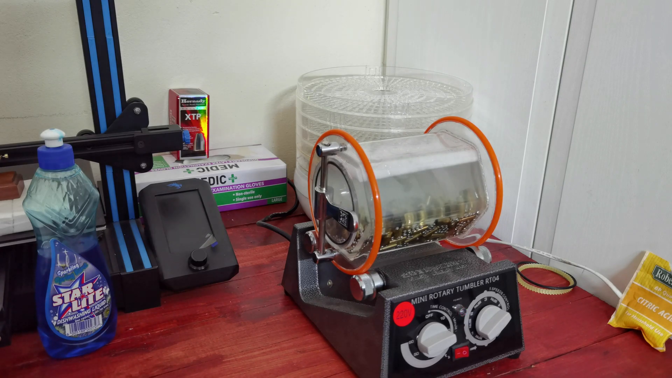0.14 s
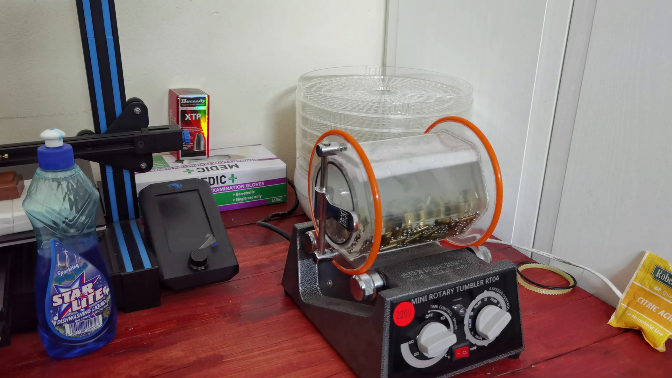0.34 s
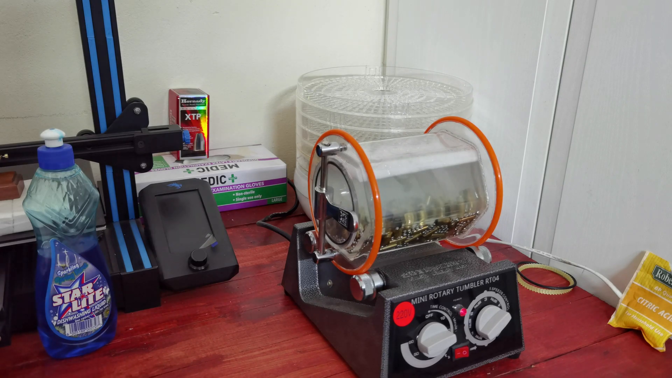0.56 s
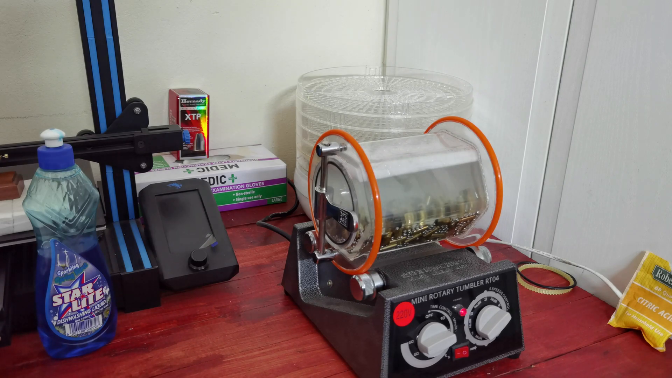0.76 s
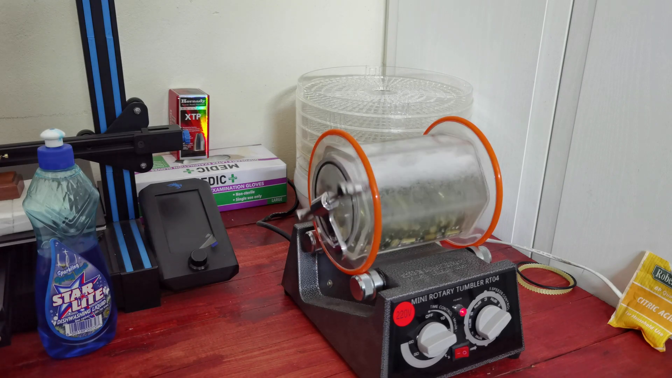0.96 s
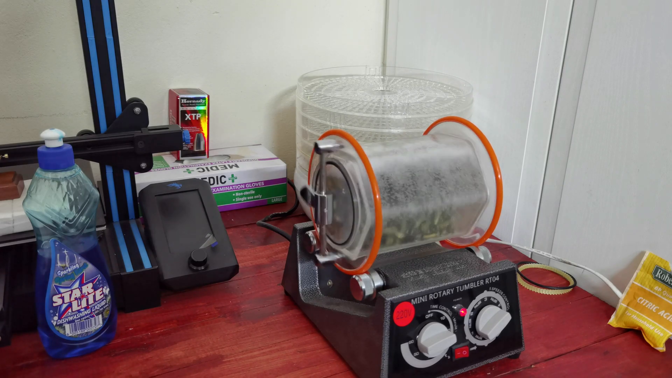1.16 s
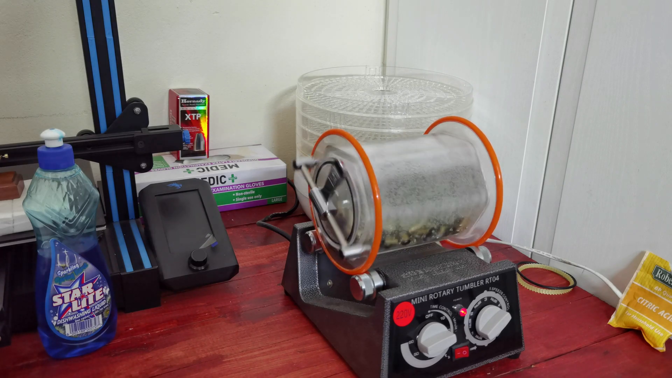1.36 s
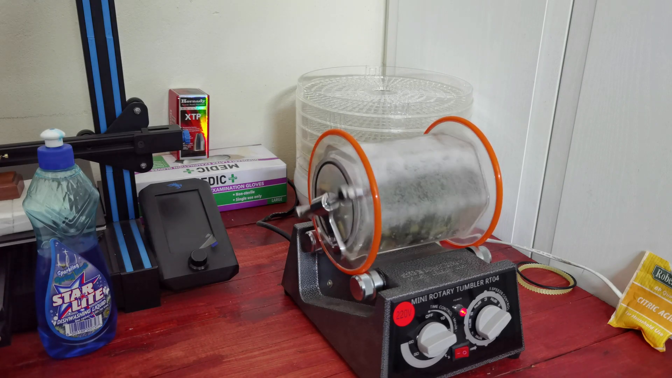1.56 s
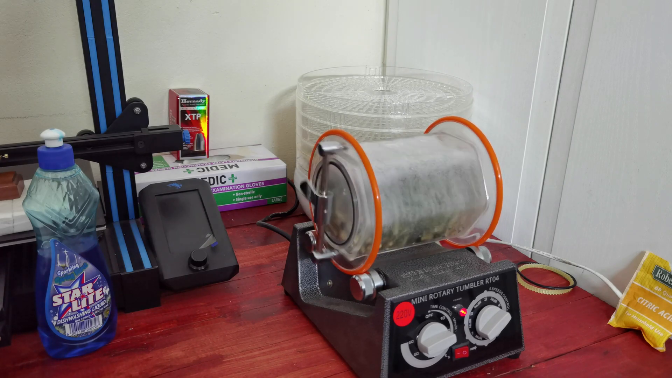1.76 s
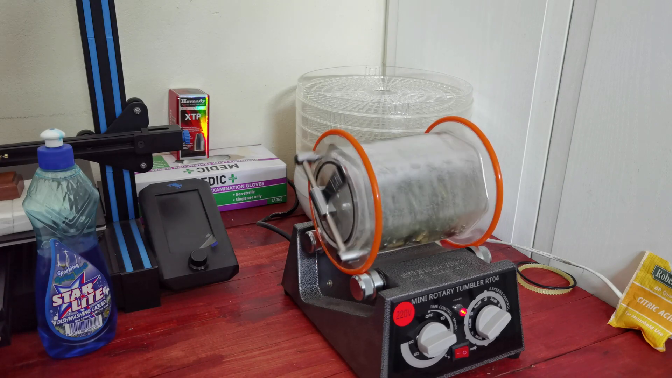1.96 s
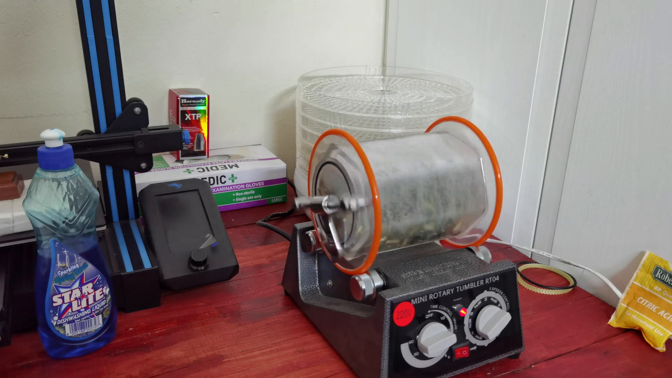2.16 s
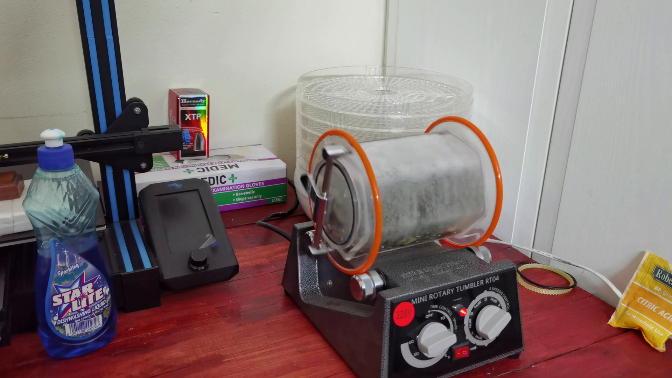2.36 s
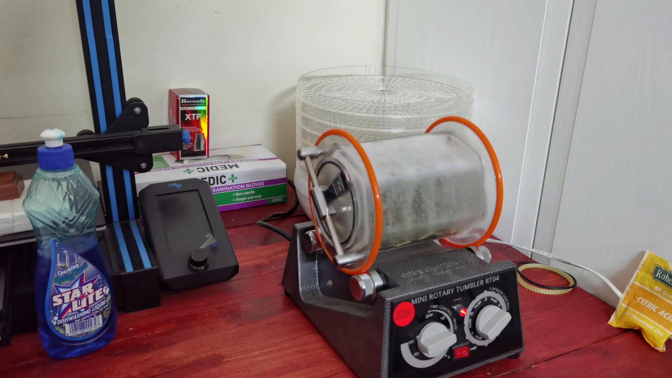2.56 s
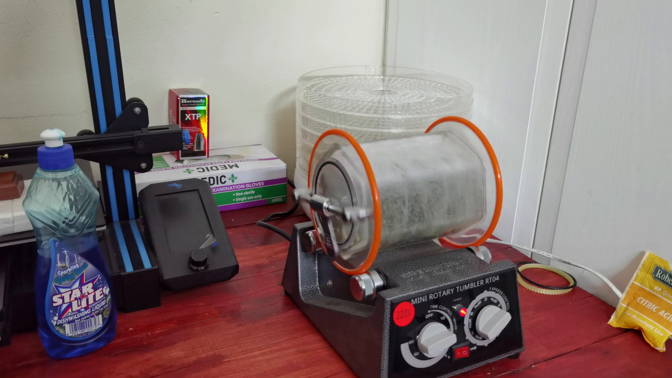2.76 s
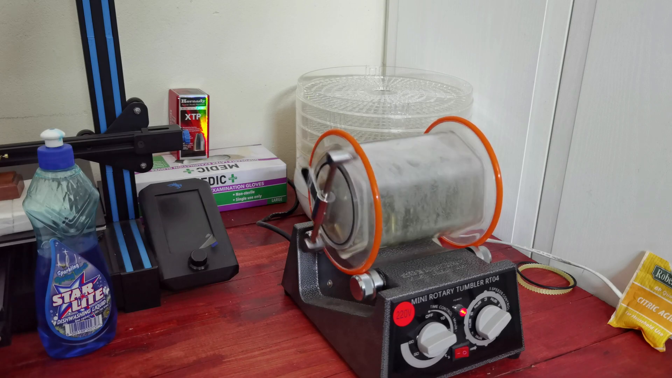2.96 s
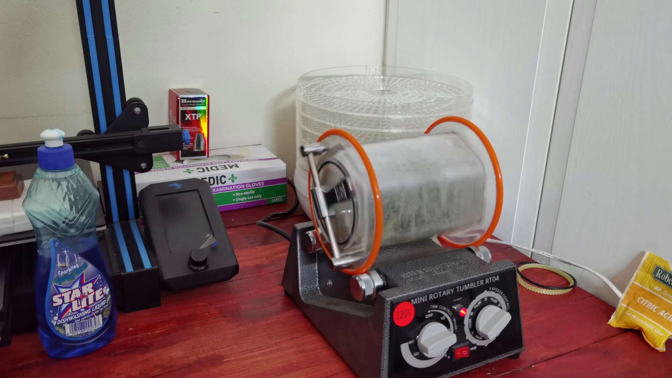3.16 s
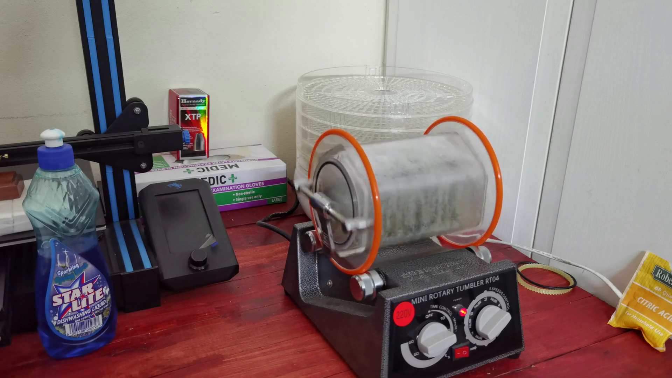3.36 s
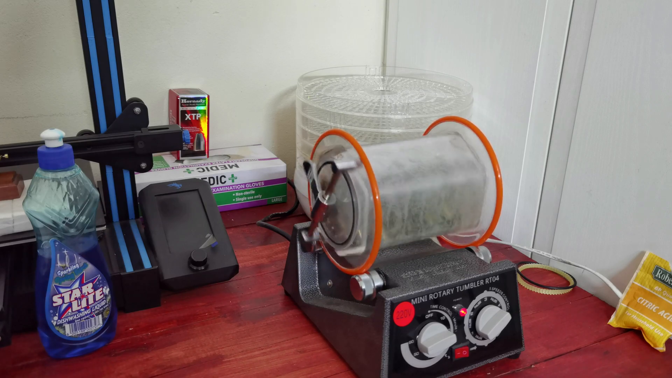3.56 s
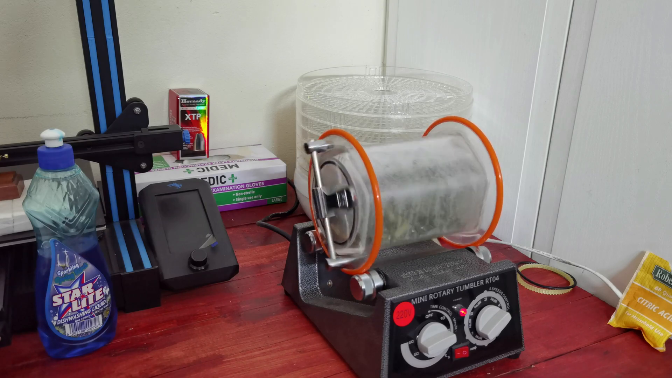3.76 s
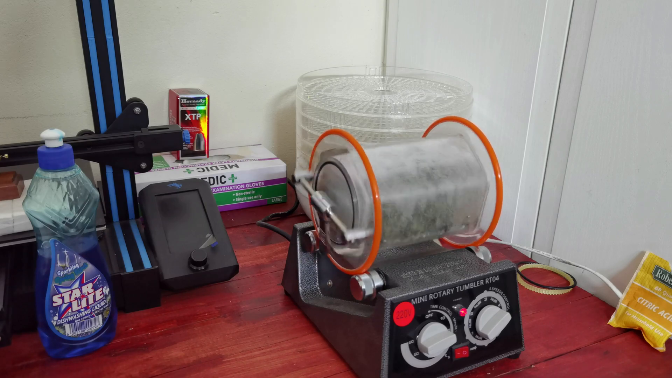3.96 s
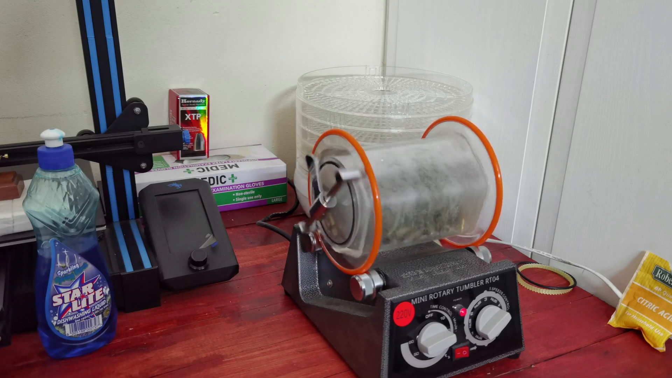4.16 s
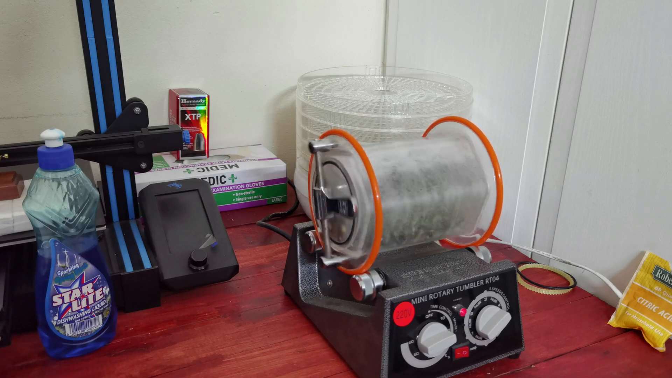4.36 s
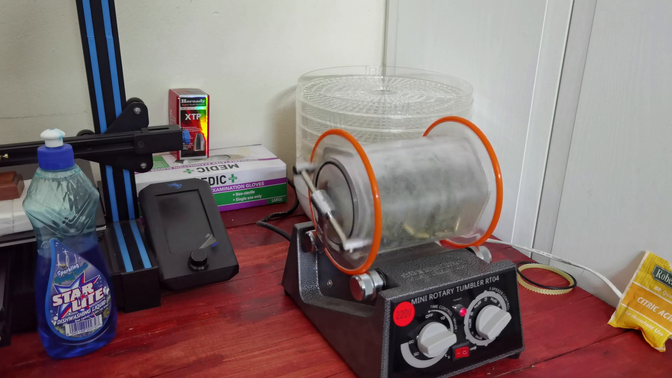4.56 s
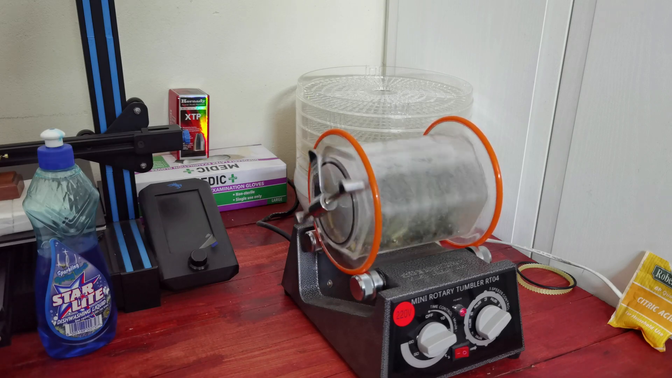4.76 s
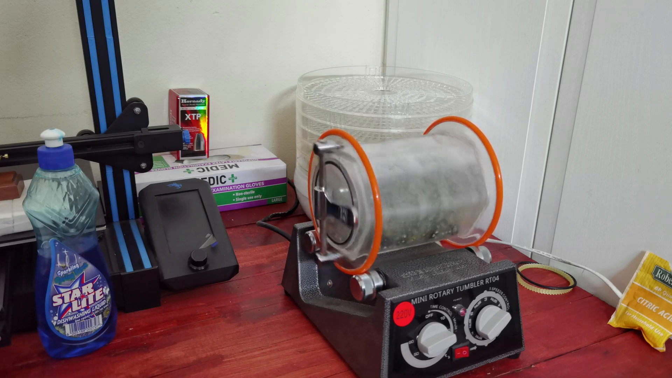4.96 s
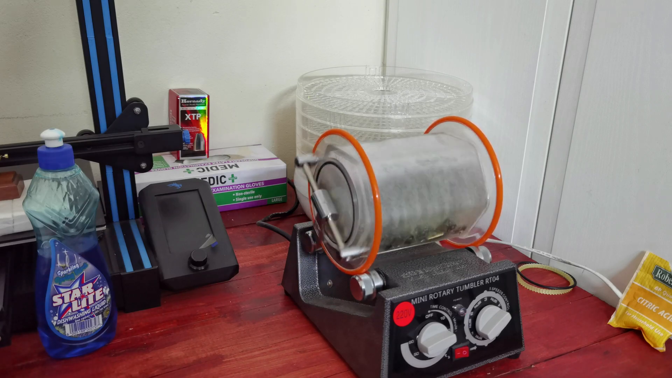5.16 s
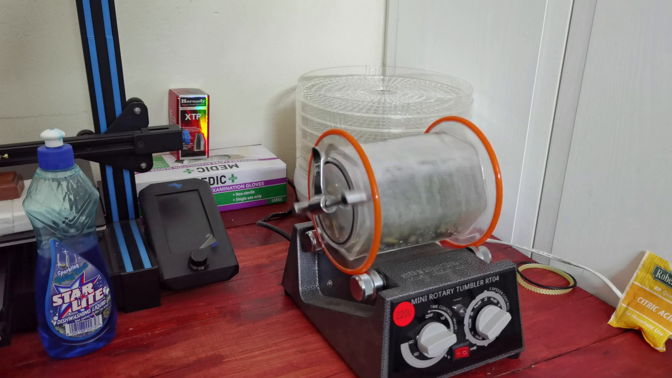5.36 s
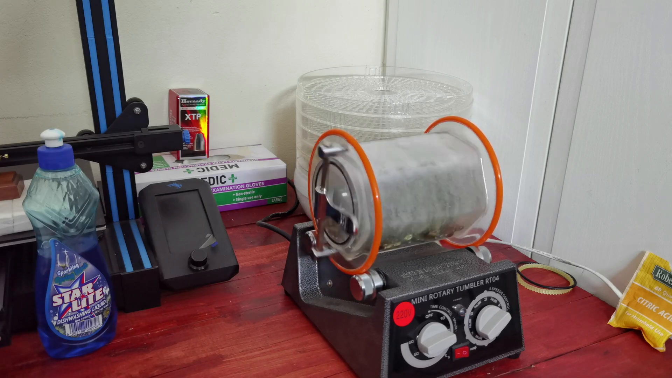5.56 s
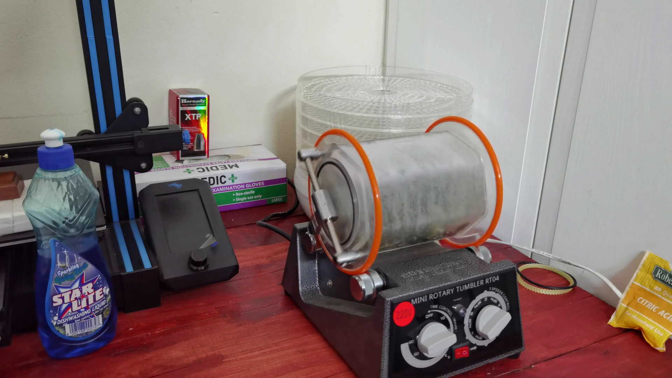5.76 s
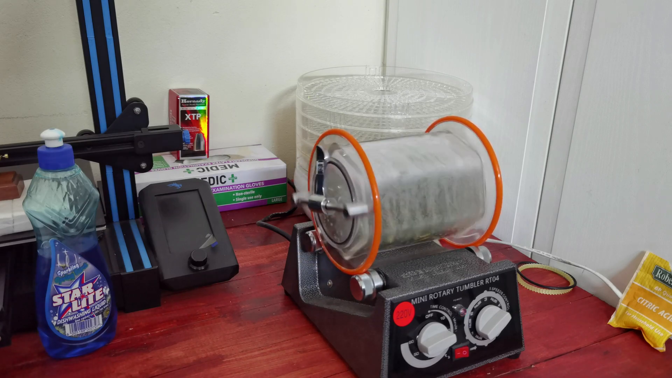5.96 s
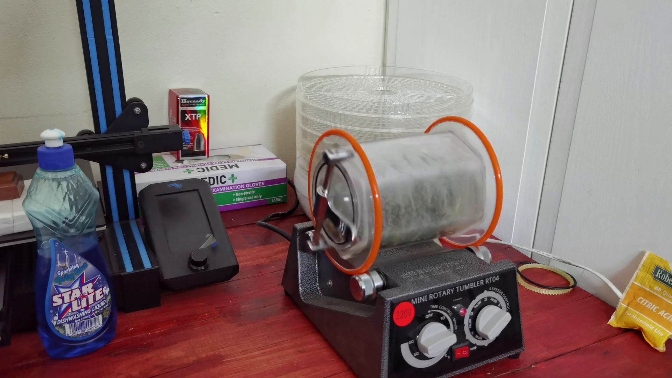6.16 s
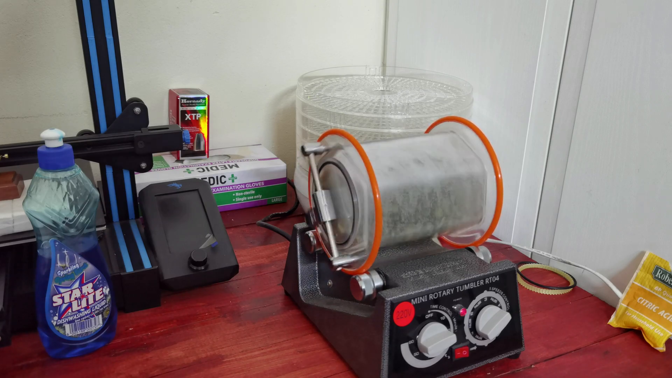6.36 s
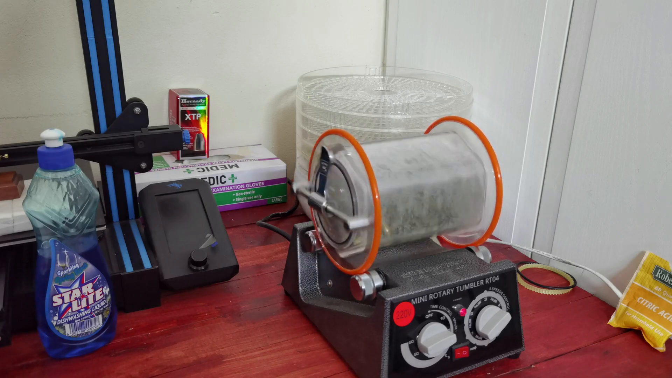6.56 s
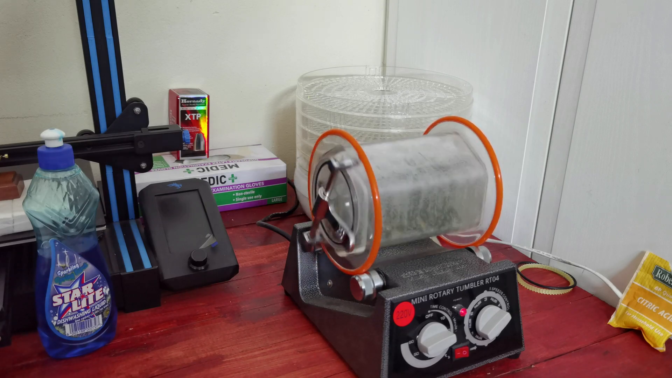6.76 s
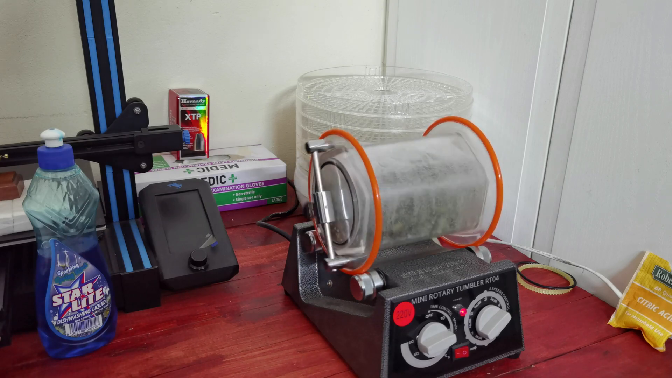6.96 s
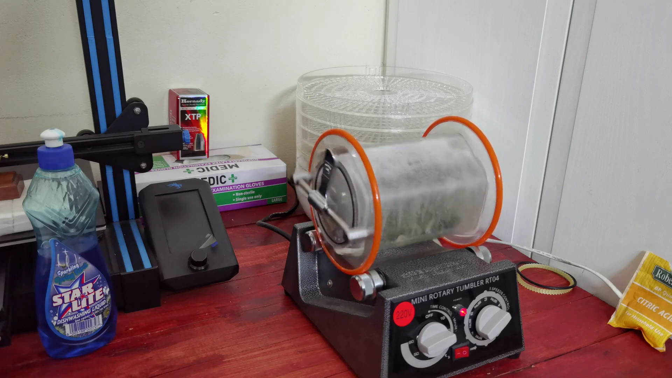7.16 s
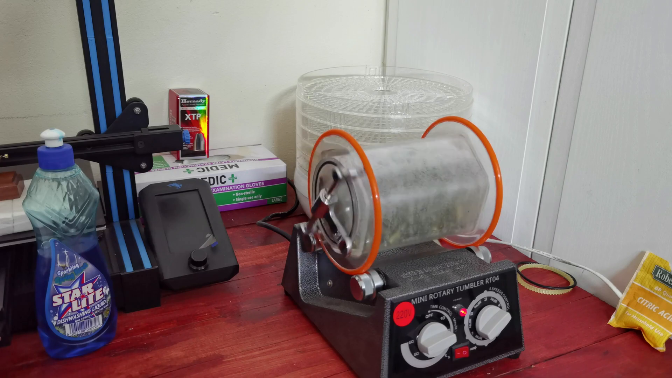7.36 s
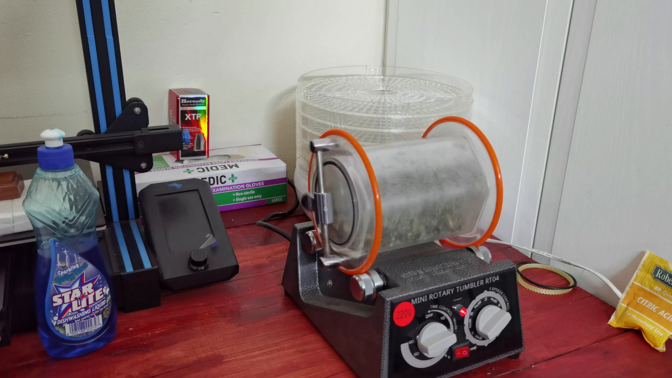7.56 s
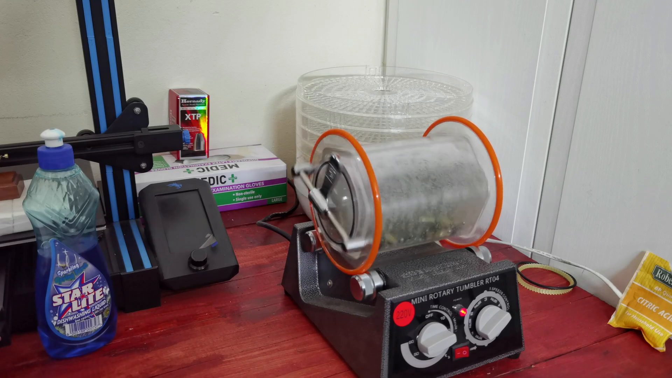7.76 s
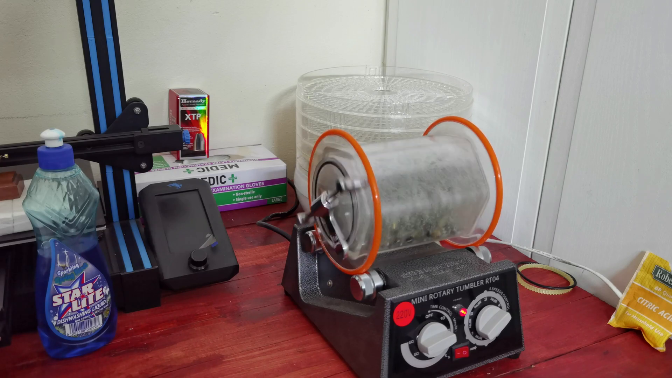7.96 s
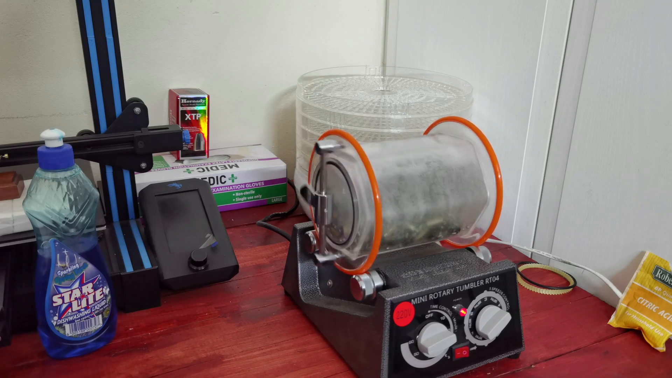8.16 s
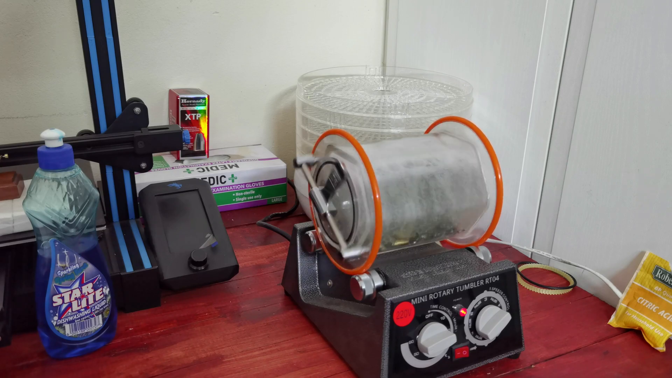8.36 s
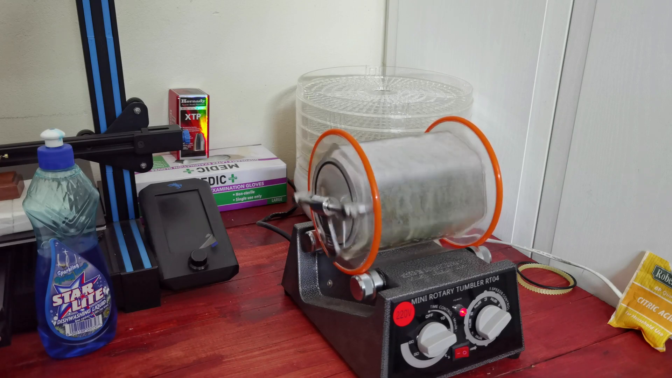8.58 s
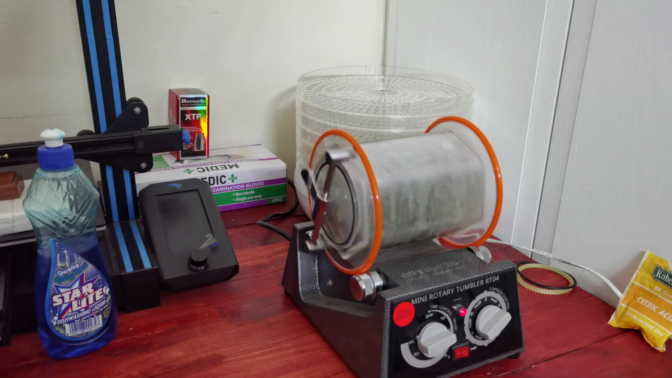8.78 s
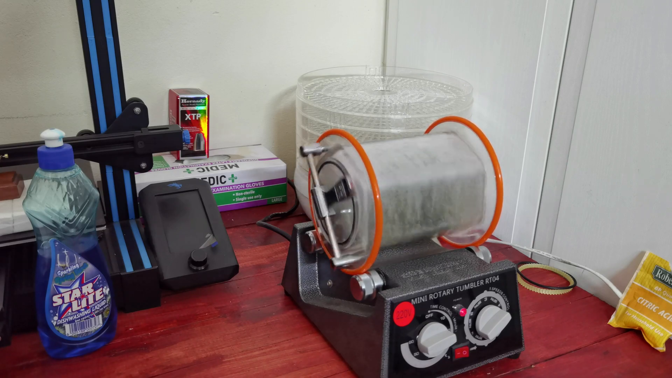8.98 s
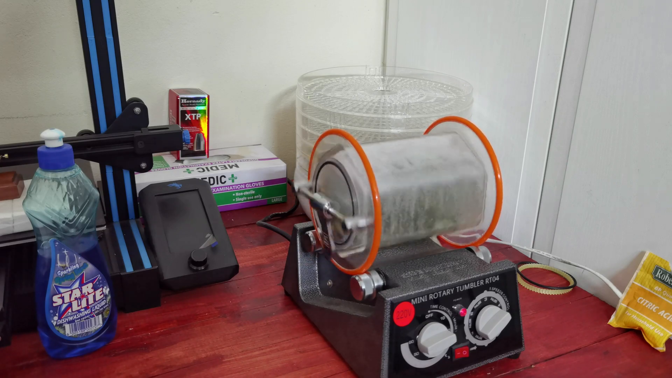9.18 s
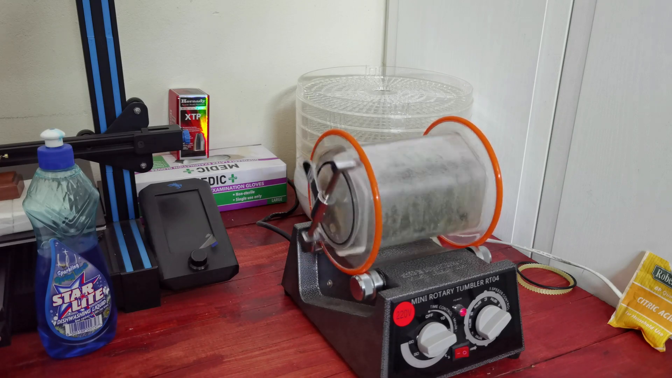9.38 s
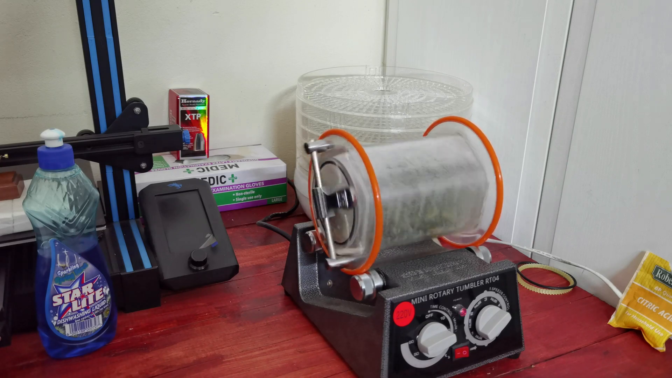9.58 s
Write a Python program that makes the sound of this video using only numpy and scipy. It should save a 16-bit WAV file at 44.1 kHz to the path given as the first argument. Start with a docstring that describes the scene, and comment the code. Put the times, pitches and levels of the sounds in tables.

```python
"""On a desk in a quiet room, a small motor turns a plastic drum of brass cases, steel pins and soapy water.
A faint rattle ticks, a switch snaps and the motor starts. Countless small impacts merge into a hiss,
over which single cases ring against the wall. The motor hums, its gears whine up to speed, and a bump
in the drive thumps the desk about twice a second. The whole level sinks slowly, with a few brief dips."""
import sys
import numpy as np
from scipy import signal
from scipy.fft import rfft, irfft, next_fast_len
from scipy.io import wavfile
from scipy.ndimage import uniform_filter1d, minimum_filter1d, map_coordinates

SR = 44100
rng = np.random.default_rng(int(sys.argv[2]) if len(sys.argv) > 2 else 0)


def bounce(signal):
    """Save signal as a 16-bit WAV file at the path given by the first command-line argument."""
    frames = np.transpose(np.atleast_2d(signal))
    limited = np.clip(frames, -1, 1)
    pcm = np.round(limited * 32767).astype(np.int16)
    wavfile.write(sys.argv[1], SR, pcm)


N = 424241
TIME = np.arange(N) / SR

# Table levels are relative: each source adds its own gain.
# The load is lifted, falls, then churns evenly: time_s, hiss_db, knock_over_hiss_db
LOAD_LEVELS = [(0.93, -35, -13), (0.995, -38, -15), (1.01, -32, -18), (1.085, -35, -19), (1.1, -28.5, -13),
               (1.125, -28, -14.5), (1.19, -15, -19), (1.24, -14, -15), (1.3, -16.5, -15),
               (1.42, -15.5, -13.5), (1.51, -17, -12), (1.58, -19.5, -12), (1.9, -17, -15),
               (3.0, -17.5, -13.5), (9.62, -17.5, -14)]
# Louder slides of the heap: peak_s, boost_db
SLIDES = [(1.9, 6), (2.395, 1), (2.5, 3), (2.6, 2), (3.07, 2), (3.16, 6), (3.38, 4), (3.6, 4), (3.96, 4.5),
          (4.14, 0), (5.52, 3), (5.63, 4), (5.7, 3.5), (5.8, 5), (6.1, 4.5), (6.67, 4), (7.26, -3),
          (8.3, 3), (8.74, 3.5), (9.11, 3.5), (9.29, 4), (9.38, 3.5)]
# Steady flutter of the load: rate_hz, peak_s, depth_db
LOAD_FLUTTER = (10.3, 0.082, 0.47)
# Spectrum of the steel pins: frequency_hz, level_db
PIN_SPECTRUM = [(2350, -39.5), (4000, -36), (4640, -18), (5300, -11), (5880, -8), (6500, -7), (7200, -6.5),
                (7900, -1.5), (8430, 1.5), (8920, -3), (9600, -9.5), (11400, -23), (14800, -53.5),
                (22000, -120)]
# Spectrum of the brass cases: frequency_hz, level_db
CASE_SPECTRUM = [(500, -60.5), (800, -15.5), (1000, -17.5), (1300, -10), (1700, -9.5), (1950, -5),
                 (2800, -2.5), (3450, 1), (4300, 0), (5500, -3), (7000, -56)]
# Loudest blows of cases on the wall: start_s, level_db, pitch_hz, left_over_right_db
CLACKS = [(1.092, -30, 5200, 0), (1.1022, -23, 3180, -2), (1.3931, -15, 2200, 5), (1.4796, -22, 4170, 4),
          (1.514, -16, 4150, 0.0), (1.6303, -14, 3390, 2.5), (1.8127, -17, 4860, 2.0),
          (1.8965, -18, 4460, 0.5), (1.986, -22, 4380, 1.5), (2.024, -16, 4860, 1), (2.077, -22, 4080, 0.5),
          (2.375, -20, 3440, -1), (2.48, -14, 3060, 3), (2.5869, -16, 3520, 0.5), (2.6877, -20, 2900, 0),
          (2.781, -15, 3590, 3), (2.8365, -25, 4560, 0.0), (2.8947, -20, 4960, 3), (3.0284, -14, 4970, 0.0),
          (3.063, -24, 3400, 1.0), (3.151, -19, 4140, 1.0), (3.2644, -22, 4470, 0.5),
          (3.2964, -15, 4800, 3), (3.357, -14, 4450, 2), (3.444, -21, 4360, 0.5), (3.5083, -22, 4910, 0.0),
          (3.5311, -21, 4270, 2.0), (3.57, -21, 5050, -0.5), (3.7697, -24, 4540, 1.5),
          (3.9523, -23, 4810, -2), (4.0343, -16, 2720, 1), (4.1486, -19.5, 3450, 0.0),
          (4.2477, -14, 4920, 3), (4.317, -24, 2030, 0), (4.4107, -17, 3190, 1.5), (4.709, -12.5, 4870, 5),
          (4.8388, -14.5, 3800, 3), (4.9156, -21, 2880, 1.0), (4.944, -17, 3620, 0.5),
          (5.1211, -24, 4430, 3), (5.6058, -20, 3950, 1.0), (5.6754, -19, 4530, 1.0),
          (5.794, -16, 3120, -1), (5.844, -22, 4940, 1), (5.9096, -23, 4750, 5), (6.0894, -21.5, 4470, 1.5),
          (6.2014, -16, 3940, 0.5), (6.3067, -15, 4080, -0.5), (6.5329, -26, 5000, 1.0),
          (6.5689, -23, 4660, 5), (6.662, -16, 3320, 3), (6.767, -15, 3460, 5), (6.9546, -13, 3580, 2),
          (7.03, -17, 3910, 0.5), (7.058, -11.5, 3800, 2.0), (7.252, -22, 4300, 0), (7.261, -12.5, 3500, 3),
          (7.3325, -14, 6300, 2), (7.4269, -18, 3610, 1), (7.5282, -18, 4440, 3.0), (7.6324, -12, 4440, 0),
          (7.7432, -19, 3730, 1.0), (7.8095, -16, 4960, 3), (7.911, -13, 4340, 1.0),
          (8.0363, -14, 4900, -2), (8.1163, -19, 4820, 2.0), (8.1984, -16, 4970, 0.5),
          (8.493, -29, 3370, 1.5), (8.593, -24, 4070, 1.5), (8.6182, -22, 4990, 3), (8.702, -21, 3400, 3),
          (8.7373, -21, 3620, 1.0), (8.863, -17, 3170, 3), (8.8893, -17, 4770, -0.5),
          (9.09, -14.5, 3380, 1), (9.2935, -16, 4430, 4), (9.365, -18, 4470, 6), (9.4718, -19, 4980, 2.0)]
# Handfuls of pins landing at once: start_s, level_db, left_over_right_db
SPILLS = [(1.0051, -19, -1.5), (1.0276, -22, -0.5), (1.0454, -21, -1.0), (1.0899, -18, 1.0),
          (1.1273, -13, 0.0), (1.1363, -11, 0.0), (1.1567, -11, 0.0), (1.1952, -7, 0.0), (1.276, 1, -4),
          (1.3638, -6, -0.5), (1.5259, -7, -1.0), (1.5563, -10, -4), (1.6686, -11, -1.5),
          (1.7145, -8, -2.0), (1.8207, -1, 0.5), (1.8961, -5, -3), (1.926, -4, -5), (1.9619, -3, -2),
          (2.0238, -8, -0.5), (2.1754, -10, 0.0), (2.2014, -12, -1.5), (2.2942, -14, -0.5),
          (2.3371, -9, 0.0), (2.3914, -3, 0.5), (2.5027, -11, -2.0), (2.569, -12, 0.0), (2.5955, -5, -2.0),
          (2.6269, -6, 1), (2.6868, -4, -2.0), (2.7112, -8, 0.5), (2.7985, -13, 0.0), (2.8354, -1, -2),
          (2.8629, -7, -1.5), (3.0624, -6, 4), (3.1353, -2, 2), (3.247, -17, -1.0), (3.2814, -9, -0.5),
          (3.3567, -6, 0.5), (3.3787, -4, -1.0), (3.4426, -6, -0.5), (3.4665, -6, -0.5), (3.5802, -3, -1.5),
          (3.6381, -11, -2.5), (3.7214, -2, -2), (3.7658, -6, -1.5), (3.7913, -4, 0.5), (3.9085, -4, -9),
          (3.9304, -10, -2.5), (3.9564, -5, -3), (4.0153, -7, -0.5), (4.0447, -6, 0.0), (4.1345, -6, 0.0),
          (4.2467, -11, -1.5), (4.2896, -1, -4), (4.364, -13, -1.5), (4.4318, -3, 0.5), (4.5151, -12, -2.5),
          (4.5899, -10, -0.5), (4.6533, 0, -1.0), (4.7042, -12, 0.5), (4.8394, 0, -2.0), (4.9531, -7, -1.5),
          (4.9766, -2.5, -1.5), (5.009, -5, -1.0), (5.1023, -13, 0.5), (5.1776, -7, 1.0), (5.2115, -2, -1),
          (5.2914, 1, -1), (5.3831, 1, -7), (5.5163, -9, -2.0), (5.6231, -5, -1.0), (5.6989, -7, -1.5),
          (5.7917, -9, 0.0), (5.8446, -7, -0.5), (6.0212, -8, -1.0), (6.0441, -9, 0.5), (6.0955, -4, 0.0),
          (6.1808, -10, 1), (6.344, -10, -5), (6.3879, -10, -1.5), (6.4507, -1, -4), (6.4792, -5, -2.0),
          (6.6657, -10, -1.5), (6.777, -8, -2.5), (6.8558, -13, 0.5), (6.9551, -8, -0.5),
          (7.1561, -18, -1.5), (7.2374, -16, -1), (7.3013, -12, 0.0), (7.3851, -3, 0.0), (7.42, -4, -1.0),
          (7.4504, -4, -1.0), (7.6071, -3, -1.0), (7.658, -3, 0.5), (7.7318, -6, -1.0), (7.7572, -5, -1.5),
          (7.8241, -5, -0.5), (7.9363, -4, -2.5), (8.101, -14, -3), (8.2022, -7, -2.0), (8.3, -4, -1.0),
          (8.3728, -13, -0.5), (8.4921, -5, -1.5), (8.5514, -12, -2.0), (8.6178, -13, -0.5),
          (8.7365, -7, -5), (8.8797, -2, -2), (8.958, -5, -4), (9.0044, -5, -0.5), (9.1057, -12, -1.0),
          (9.2783, -9, 1.5), (9.3267, -5, -1.0), (9.3651, -3, -3), (9.4274, -6, -1.0), (9.5492, 0, 0.0)]
# The motor starts up and then runs evenly; at about 1.26 s the level steps down: time_s, hum_db, under_drum_db,
# # under_motor_db, whine_db
MOTOR_LEVELS = [(0.93, -53, -56, -52, -67), (0.96, -42, -38, -38, -57), (0.99, -38, -51, -31, -55),
                (1.05, -32, -54, -44, -51), (1.1, -36, -47, -40, -46.5), (1.14, -30, -46, -40, -49),
                (1.18, -36, -50, -39, -46), (1.22, -35, -39, -41, -47), (1.29, -45, -56, -51, -54),
                (1.4, -42, -50.5, -48, -57.5), (1.6, -39.5, -51, -43.5, -52.5),
                (9.62, -39.5, -49, -48, -52)]
# Run-up of the shaft: time_s, turns_per_s
SHAFT_SPEED = [(0.93, 4), (0.97, 9), (1.0, 13), (1.035, 15.8), (1.09, 19.8), (1.165, 22.15), (9.62, 22.15)]
# Tooth mesh and its sidebands: cycles_per_turn, level_db, blur_hz
GEAR_LINES = [(30.13, 3, 18), (29.3, 0.5, 22), (31.6, -7, 20), (28.3, -5, 22), (11.95, -5, 5),
              (20.47, -9.5, 18), (34.77, -8, 27)]
# What the casing radiates of the whine: frequency_hz, gain_db
CASING_RESPONSE = [(100, 6), (267, -0.5), (350, 1), (460, -2.5), (560, -9.5), (660, -0.5), (1000, 9)]
# Drone of the casing: frequency_hz, level_db
DRONE_SPECTRUM = [(20, -36), (45, -5), (70, 1.5), (170, -3), (220, -11.5), (270, -2), (330, -16),
                  (600, -14), (1000, -14), (1068, -0.5), (1140, -22.5)]
# Throbs of the hum: rate_hz, peak_s, depth_db
HUM_THROBS = [(5.2, 0.0067, 0.5), (8.2, 0.076, 0.5), (9.8, 0.025, 0), (5, 0.32, 1.5)]
# Pulsing of the whine: rate_hz, peak_s, depth_db
WHINE_PULSE = (10.46, 0.013, 2.3)
# Size of the chance swells: hum_db, under_drum_db, under_motor_db, whine_db
MOTOR_WANDER = (0.7, 3.3, 1.9, 0.73)
# Desk modes under the drum: centre_hz, width_hz, gain_db
MODES_UNDER_DRUM = [(123.6, 5.9, 1.5), (140.3, 15.6, -4)]
# Desk modes under the motor: centre_hz, width_hz, gain_db
MODES_UNDER_MOTOR = [(87.9, 9.4, -6.5), (74.6, 1.66, -5.5)]
# The switch is touched, then thrown: start_s, level_db
SWITCH_SNAPS = [(0.615, -22.5), (0.936, -17.5)]
# Modes of the switch body: centre_hz, width_hz, gain_db
SWITCH_MODES = [(1190, 170, -10), (2140, 230, -5), (3360, 540, -9), (5950, 840, -8), (8300, 900, -1.5),
                (11000, 2000, -21)]
# Ticks of the faint rattle: start_s, level_db
RATTLE_TICKS = [(0.0303, -56), (0.0782, -57), (0.1201, -56), (0.165, -56), (0.2094, -56), (0.2533, -55),
                (0.2957, -56), (0.3361, -57), (0.3765, -55), (0.417, -57), (0.4584, -56), (0.4948, -55),
                (0.5317, -54), (0.5741, -55), (0.6165, -58), (0.6579, -55), (0.7003, -57), (0.7402, -55),
                (0.7776, -54), (0.816, -59), (0.856, -59), (0.8984, -58)]
# Modes of the rattling object: centre_hz, width_hz, gain_db
RATTLE_MODES = [(2140, 200, -13), (3460, 140, -4.5), (5260, 170, -3), (5540, 120, -1), (5900, 170, -2),
                (6790, 300, -11), (8550, 200, -5)]
# Background noise of the room: frequency_hz, level_db
ROOM_SPECTRUM = [(15, -36), (25, -9), (77, 3.5), (229, -6.5), (456, -11.5), (862, -8), (1710, -17.5),
                 (2100, -8), (3160, -13), (3500, -16), (3970, -14), (5390, -9), (7700, -12), (8750, -1),
                 (11000, -52), (14300, -82), (22000, -120)]
# Faint hum in the room: pitch_hz, level_db
ROOM_HUM = (234.4, -77)
# Echoes from the desk and corner: delay_s, left_db, right_db
REFLECTIONS = [(.0011, -46, -31), (.0038, -21.5, -23.5), (.0081, -13.5, -18)]
# Reverberation time of the room: frequency_hz, t60_s
ROOM_DECAY = [(200, 0.59), (2000, 0.2), (10000, 0.15)]
# Likeness of left and right: frequency_hz, coherence
COHERENCE = [(40, 0.85), (120, 0.95), (250, 1), (500, 0.97), (1000, 0.43), (2000, 0.6), (4000, 0.11),
             (10000, 0.033)]
# Balance of the two sides: frequency_hz, left_over_right_db
BALANCE = [(60, 7), (110, 4), (200, 2.5), (380, -1), (700, 0.5), (1290, 1), (2380, 1), (4400, -0.5),
           (8120, -1.5), (15000, 3.5)]
# Phase between the two sides: frequency_hz, left_lead_rad
PHASE_LEAD = [(200, 0.57), (1000, -1), (1500, -1.3), (2100, -0.97), (3500, 0.17), (5000, -0.54),
              (9000, -1.13)]
# Sudden dips of the whole sound: start_s, depth_db
DIPS = [(1.262, 5), (2.21, 3), (2.41, 4), (3.201, 3), (5.71, 2), (6.346, 7), (6.779, 7.5)]

START_S = 0.936  # the motor gets power


def churning_load():
    """Superposition: dense pin contacts and sparser case knocks merge with the wash of the water."""
    hiss_db, knock_db = curves(LOAD_LEVELS)
    surge_db = 0.43 * wobble(14) + 0.43 * wobble(45) + swing(*LOAD_FLUTTER)  # small avalanches
    slide_db = sum(db * np.exp(-((TIME - s) / 0.007) ** 2) for s, db in SLIDES)
    smear = rng.standard_normal((2, 128)) * np.exp(-np.arange(128) / SR / 0.00056)  # a blow lasts a moment
    blows = unit(signal.fftconvolve(contacts(per_s=1300, spread_db=2.5), smear, axes=1)[:, :N])
    pins = 0.85 * contacts(per_s=7000, spread_db=2.0) + 0.72 * blows + 0.5 * rng.standard_normal((2, N))
    pins += 0.19 * clinks(per_s=400, mid_hz=7522, octaves=0.472, decay_cycles=24)
    cases = 0.5 * contacts(per_s=4000, spread_db=1.5) + 0.5 * blows + 0.53 * rng.standard_normal((2, N))
    cases += 0.3 * clinks(per_s=900, mid_hz=2898, octaves=0.803, decay_cycles=16)
    hiss = amp(hiss_db + surge_db + slide_db + 2) * unit(filtered(pins, minimum_phase(PIN_SPECTRUM)))
    case_db = hiss_db + knock_db + surge_db + 0.39 * slide_db + 0.19 * wobble(11) + 2.5
    knock = amp(case_db) * unit(filtered(cases, minimum_phase(CASE_SPECTRUM)))
    return running() * stereo(sloshed(hiss + knock, patchy_db=0.96))


def contacts(per_s, spread_db):
    """Shot noise: impulses at random times and angles, a few much larger than the rest; rms 1."""
    when, chance, turn = rng.random((int(per_s * N / SR), 3)).T
    size = amp(-spread_db * np.log(chance + 3e-3))
    at, angle = (when * N).astype(int), 2 * np.pi * turn
    return unit(np.array([np.bincount(at, size * side, N) for side in (np.cos(angle), np.sin(angle))]))


def clinks(per_s, mid_hz, octaves, decay_cycles):
    """Free vibration: metal parts meet and ring as damped sines, the higher dying sooner; rms 1."""
    when, pitch, chance, turn = np.hsplit(rng.random((int(per_s * N / SR), 4)), 4)
    t = np.arange(SR // 80) / SR
    hz = mid_hz * 2 ** (octaves * (2 * pitch - 1))
    size = amp(-3 * np.log(chance + 0.039))
    envelope = np.exp(-t * hz / decay_cycles) * (1 - np.exp(-t / 0.000088))
    ring = size * envelope * np.sin(2 * np.pi * hz * t)
    at = ((when * N).astype(int) + np.arange(len(t))).ravel()
    sides = np.cos(2 * np.pi * turn), np.sin(2 * np.pi * turn)
    return unit(np.array([np.bincount(at, (ring * side).ravel(), N)[:N] for side in sides]))


def sloshed(x, patchy_db):
    """Varying attenuation: water and foam cover and bare the load, so its colour shifts in patches."""
    spectra = signal.stft(x, nperseg=512)[2]
    patches = uniform_filter1d(rng.standard_normal(spectra.shape[1:]), size=8, axis=0)
    patches = unit(uniform_filter1d(patches, size=8, axis=1))
    coloured = signal.istft(spectra * amp(patchy_db * patches), nperseg=512)[1][:, :N]
    return unit(coloured) * np.sqrt(np.mean(x ** 2))


def case_clacks(ring_t60_s=0.016):
    """Impact excitation: a case strikes the drum, the wall knocks and the case rings at its own pitch."""
    ring, t = np.zeros((2, N + SR)), np.arange(SR // 10) / SR
    for s, db, hz, pan_db in CLACKS:
        tone = np.sin(2 * np.pi * (hz * t + 0.19 * rng.random((2, 1)))) * (1 - np.exp(-t / 0.00072))
        add_at(ring, s, panned(db - 3 - 60 * t / ring_t60_s, pan_db) * tone)
    blows = bursts([(s, db, pan_db) for s, db, _, pan_db in CLACKS], t60_s=0.0037, shared=1.1)
    wall = modes([(1890, 840, -7.5), (3440, 890, 3.5), (4900, 1350, 4.0)])
    knocks = filtered(blows, lambda hz: wall(hz) / (1 + 1j * hz / 9000) ** 2)
    return ring[:, :N] + amp(5.5) * knocks


def pin_spills():
    """Incoherent summation: pins landing together make one short, bright burst of noise."""
    return amp(7.5) * filtered(bursts(SPILLS, t60_s=0.012, shared=0.27), minimum_phase(PIN_SPECTRUM))


def motor(hum_hz=99.64):
    """Forced vibration: the mains makes the motor hum, and the drive shakes its casing and the desk."""
    levels = [db + wander_db * wobble(12) for db, wander_db in zip(curves(MOTOR_LEVELS), MOTOR_WANDER)]
    hum_db, under_drum_db, under_motor_db, whine_db = levels
    hum_db += sum(swing(*throb) for throb in HUM_THROBS)
    hum = amp(hum_db) * np.sqrt(2) * np.sin(2 * np.pi * hum_hz * TIME + 0.085 * wobble(4.5))
    whine = amp(whine_db - 5) * gear_whine()
    desk = amp(under_drum_db + 4) * desk_shake(MODES_UNDER_DRUM, steadiness=0.66)
    desk += amp(under_motor_db) * desk_shake(MODES_UNDER_MOTOR, steadiness=0.76)
    direct = (hum + whine + desk + desk_thumps()) * amp([[1.3], [-1.4]])
    drone = amp(whine_db + 2.5) * coloured_noise(DRONE_SPECTRUM)
    return running() * (direct + stereo(drone))


def gear_whine(strain_rad=9, slow_loss_db=4):
    """Phase modulation blurs mesh tones tied to the shaft; slow gears sound rougher and fainter."""
    speed, = curves(SHAFT_SPEED)
    turns = np.cumsum(speed) / SR
    slowness = 1 - speed / speed[-1]
    jitter_rad = 1.13 + strain_rad * slowness
    whine = np.zeros(N)
    for order, db, blur_hz in GEAR_LINES:
        gain = amp(db + 1.35 * wobble(2 * blur_hz))
        whine += gain * unit(np.cos(2 * np.pi * order * turns + jitter_rad * wobble(2 * blur_hz)))
    radiated = filtered(whine, lambda hz: amp(along(CASING_RESPONSE, hz)))
    return amp(swing(*WHINE_PULSE) - slow_loss_db * slowness) * radiated


def desk_shake(table, steadiness):
    """Resonance: noise excites the desk modes, its swells partly evened out as the drive never stops."""
    response = modes(table)
    ring = filtered(filtered(rng.standard_normal(N), response), response)
    analytic = signal.hilbert(ring, next_fast_len(N))[:N]
    return unit(analytic.real / np.abs(analytic) ** steadiness)


def desk_thumps(first_s=1.3996, period_s=0.5826, lead_s=0.12, pitch_hz=127):
    """Periodic forcing: a bump in the drive passes the roller and jolts the desk, just after a weaker one."""
    out, t = np.zeros(N + SR), np.arange(SR // 5) / SR - 0.1
    crossings = np.arange(first_s, N / SR, period_s)
    envelope = np.exp(-(t / 0.015) ** 2)
    for times, db in [(crossings, -28.5), (crossings - lead_s, -34.5)]:
        for s in times:
            shake = np.sin(2 * np.pi * (pitch_hz * t + rng.random()))
            add_at(out, s + t[0], amp(db + 1.5 * rng.standard_normal()) * envelope * shake)
    return out[:N]


def switch(t60_s=0.016):
    """Damped resonance: a short burst of noise in the modes of a plastic body makes a dry snap."""
    out, t = np.zeros((2, N + SR)), np.arange(SR // 10) / SR
    for s, db in SWITCH_SNAPS:
        burst = rng.standard_normal(len(t)) + 0.22 * rng.standard_normal((2, len(t)))
        add_at(out, s, amp(db + 2 - 60 * t / t60_s) * burst * (1 - np.exp(-t / 0.0014)))
    return filtered(out[:, :N], modes(SWITCH_MODES))


def rattle():
    """Repeated impact: until the start, about 24 taps a second and their scatter ring something far off."""
    times, levels_db = np.transpose(RATTLE_TICKS)
    taps = np.bincount((times * SR).astype(int), amp(levels_db + 15.5), N)
    scatter = bursts([(s, db, 0) for s, db in RATTLE_TICKS], t60_s=0.088, shared=0.4)
    return amp(13.5) * filtered(taps + scatter, modes(RATTLE_MODES))


def room_tone():
    """Ambient noise: a quiet broadband floor and one faint, wavering hum."""
    hz, db = ROOM_HUM
    hum = amp(db + 0.88 * wobble(6.8)) * np.sqrt(2) * np.sin(2 * np.pi * hz * TIME)
    return hum + amp(-63.5) * stereo(coloured_noise(ROOM_SPECTRUM))


def with_reflections(x):
    """Comb filtering: delayed copies from the desk and corner interfere with the direct sound."""
    def response(hz):
        return 1 + sum(amp([[left], [right]]) * np.exp(-2j * np.pi * hz * s) for s, left, right in REFLECTIONS)
    return filtered(x, response)


def reverberation(x):
    """Absorption: each frequency of the walls' diffuse echo decays at its own rate."""
    hz, t, spectra = signal.stft(rng.standard_normal((2, SR // 2)), SR, nperseg=256)
    decay = amp(-60 * t / along(ROOM_DECAY, hz)[:, None])
    tail = signal.istft(spectra * decay, SR, nperseg=256)[1]
    return signal.fftconvolve(x, tail / np.linalg.norm(tail[0]), axes=1)[:, :N]


def stereo(pair):
    """Partial coherence: two unrelated signals mix into left and right, offset in level and phase."""
    def blend(hz):
        angle = np.arccos(along(COHERENCE, hz)) / 2
        return np.array([np.cos(angle), np.sin(angle)])

    def offset(hz):
        left = amp(along(BALANCE, hz) / 2) * np.exp(0.5j * along(PHASE_LEAD, hz))
        return np.array([left, 1 / left])
    mid, side = filtered(pair, blend)
    return filtered(np.array([mid + side, mid - side]), offset)


def overall_gain(sag_db_per_s=0.3971, recover_s=0.036):
    """Exponential decay: the whole sound sinks slowly after the start, and each brief dip fades out."""
    sag_db = sag_db_per_s * np.clip(TIME - START_S, 0, None)
    dip_db = sum(db * (TIME >= s) * np.exp(-np.abs(TIME - s) / recover_s) for s, db in DIPS)
    return amp(-sag_db - uniform_filter1d(dip_db, size=88))


def bursts(rows, t60_s, shared):
    """Decaying noise for each (start_s, level_db, left_over_right_db), part of it common to both sides."""
    out, t = np.zeros((2, N + SR)), np.arange(SR // 10) / SR
    for s, db, pan_db in rows:
        noise = shared * rng.standard_normal(len(t)) + rng.standard_normal((2, len(t)))
        add_at(out, s, panned(db - 60 * t / t60_s, pan_db) * noise)
    return out[:, :N]


def coloured_noise(spectrum):
    """Spectral shaping of two unrelated white noises; rms 1."""
    return unit(filtered(rng.standard_normal((2, N)), lambda hz: amp(along(spectrum, hz))))


def modes(table):
    """Modal sum of (centre_hz, width_hz, gain_db) resonances with alternating signs."""
    return lambda hz: sum((-1) ** k * amp(db) * 1j * hz * width / (centre ** 2 - hz ** 2 + 1j * hz * width)
                          for k, (centre, width, db) in enumerate(table))


def minimum_phase(spectrum):
    """Causal response with the given spectrum, found by folding the cepstrum."""
    def response(hz):
        cepstrum = irfft(along(spectrum, hz) * np.log(10) / 20)
        half = len(cepstrum) // 2
        cepstrum[1:half] *= 2
        cepstrum[half:] = 0
        return np.exp(rfft(cepstrum))
    return response


def filtered(x, response):
    """Linear filtering: the spectrum of x times a complex response of frequency."""
    size = next_fast_len(N + SR // 2)
    return irfft(rfft(x, size) * response(np.fft.rfftfreq(size, 1 / SR)), size)[..., :N]


def running():
    """Gate: 0 before the motor gets power, 1 just after."""
    return np.clip((TIME - START_S) / 0.0052, 0, 1)


def swing(rate_hz, peak_s, depth_db):
    """Periodic modulation of level, in dB."""
    return depth_db * np.cos(2 * np.pi * rate_hz * (TIME - peak_s))


def wobble(knots_per_s):
    """Random modulation: a smooth curve through Gaussian knots."""
    return map_coordinates(rng.standard_normal(int(N * knots_per_s / SR) + 4), [TIME * knots_per_s])


def curves(rows):
    """Linear interpolation in time of each column after the first."""
    times, *columns = np.transpose(rows)
    return [np.interp(TIME, times, column) for column in columns]


def along(points, hz):
    """Interpolation of (frequency_hz, value) points on a log axis."""
    knots_hz, values = np.transpose(points)
    return np.interp(np.log(hz + 1), np.log(knots_hz + 1), values)


def add_at(out, start_s, sound):
    """Superposition of a sound on out, from start_s."""
    out[..., round(start_s * SR):][..., :sound.shape[-1]] += sound


def panned(db, pan_db):
    """Level panning: left and right gains pan_db apart."""
    return amp(db + np.array([[pan_db], [-pan_db]]) / 2)


def amp(db):
    """Amplitude ratio of a level in dB."""
    return 10 ** (np.asarray(db) / 20)


def unit(x):
    """Normalisation to rms 1."""
    return x / np.sqrt(np.mean(x ** 2) + 1e-20)


def scene():
    """Superposition of all sources; the clacks and the switch also reverberate."""
    clacks, snaps = case_clacks(), switch()
    echo = reverberation(amp(1.5) * clacks + snaps)
    drum = clacks + pin_spills() + with_reflections(churning_load())
    return overall_gain() * (drum + motor() + snaps + echo + rattle() + room_tone())


def record(dry, ceiling=0.95, top_hz=15650):
    """Peak and band limiting: a quick gain ducks the highest peaks, and nothing above top_hz is kept."""
    needed_gain = np.minimum(1, ceiling / (np.abs(dry).max(axis=0) + 1e-9))
    gain = uniform_filter1d(minimum_filter1d(needed_gain, size=128), size=96)
    return filtered(dry * gain, lambda hz: hz < top_hz)


dry = scene()
out = record(dry)
bounce(out)
```